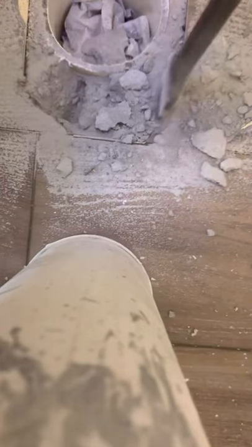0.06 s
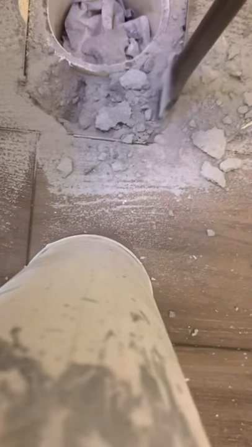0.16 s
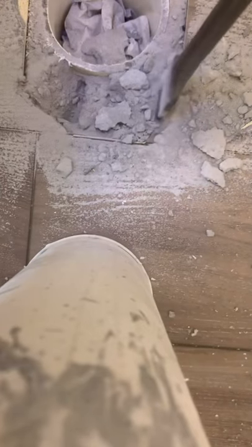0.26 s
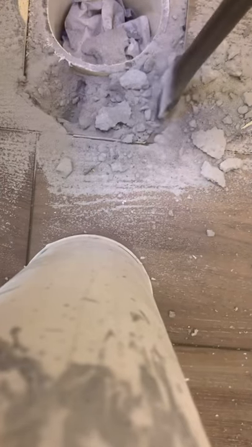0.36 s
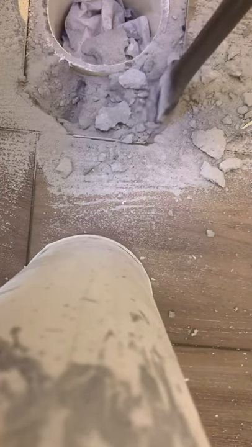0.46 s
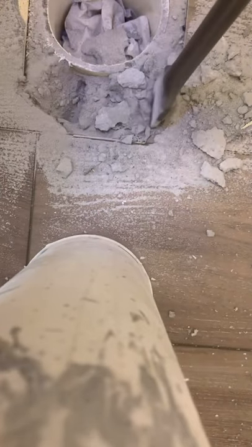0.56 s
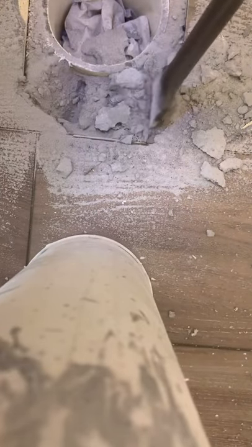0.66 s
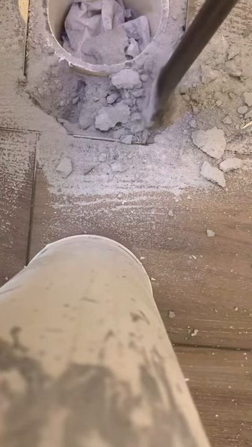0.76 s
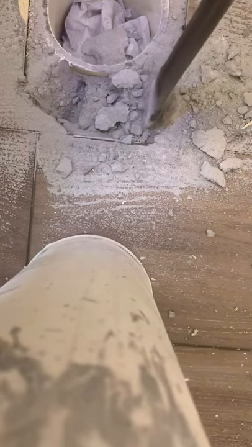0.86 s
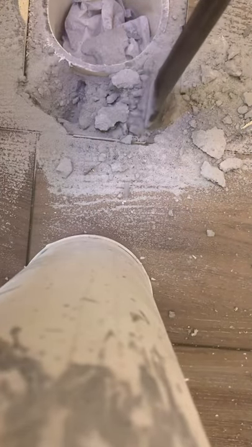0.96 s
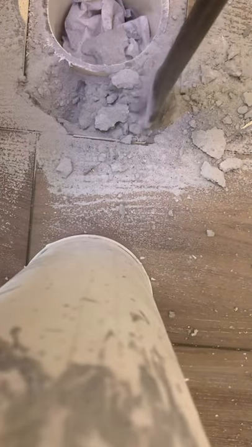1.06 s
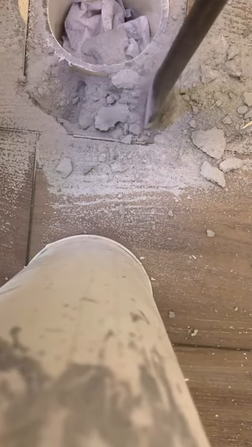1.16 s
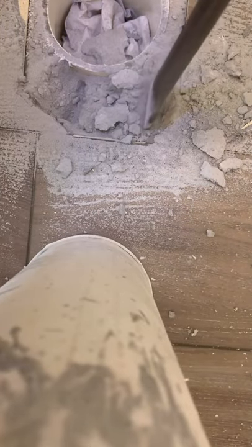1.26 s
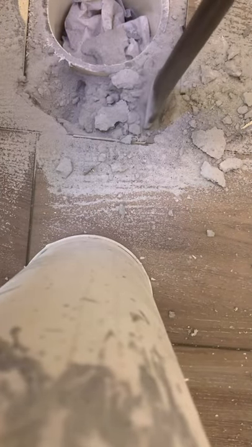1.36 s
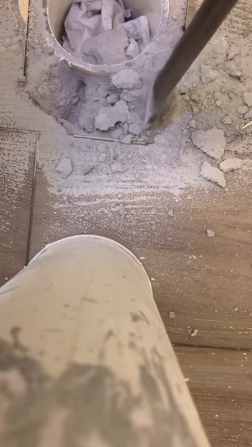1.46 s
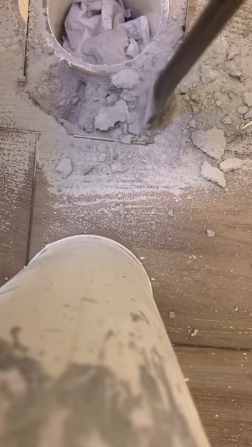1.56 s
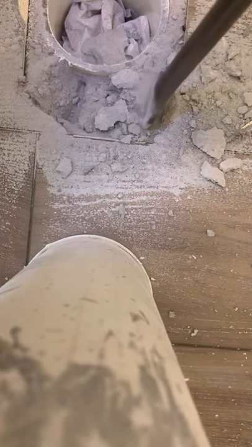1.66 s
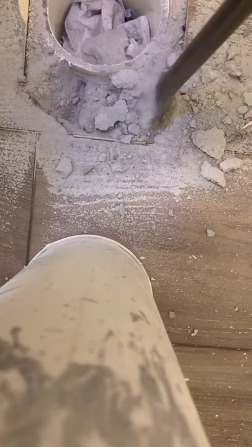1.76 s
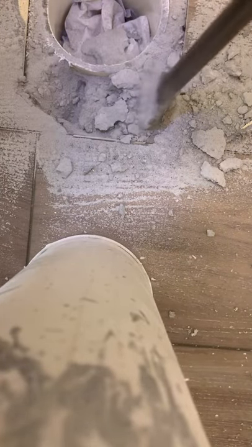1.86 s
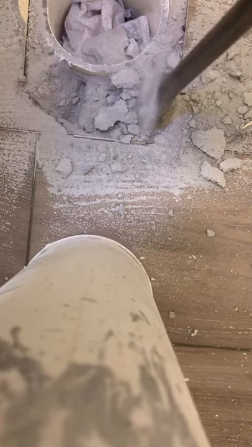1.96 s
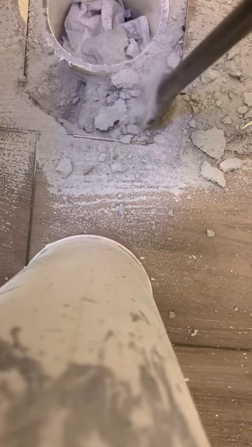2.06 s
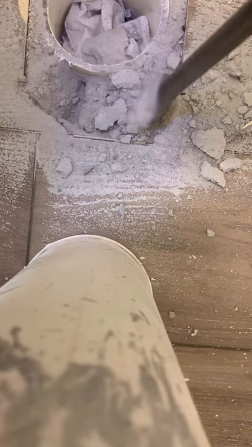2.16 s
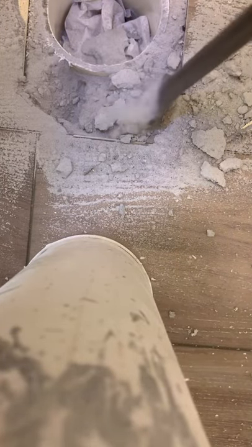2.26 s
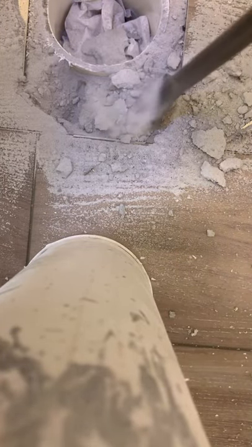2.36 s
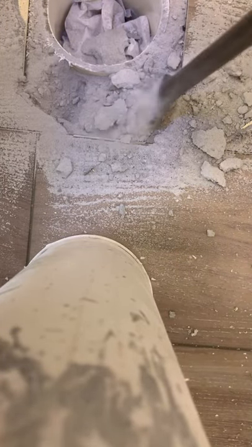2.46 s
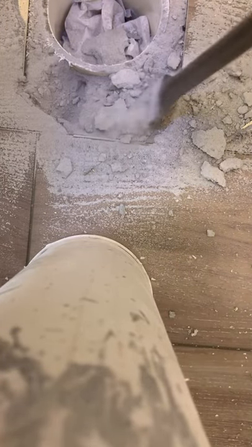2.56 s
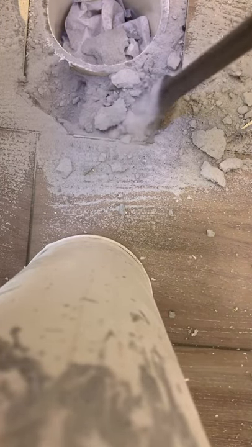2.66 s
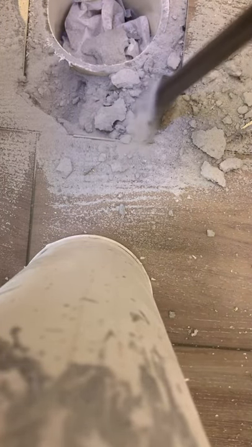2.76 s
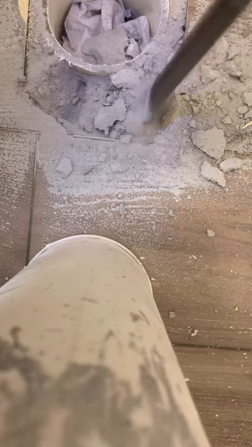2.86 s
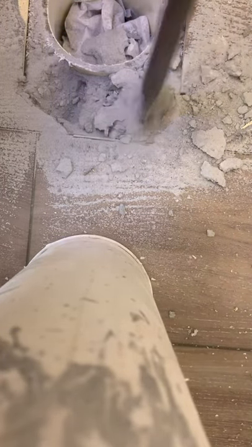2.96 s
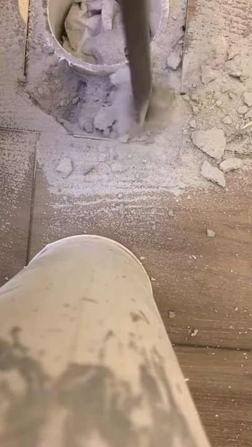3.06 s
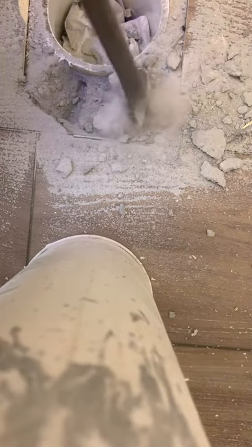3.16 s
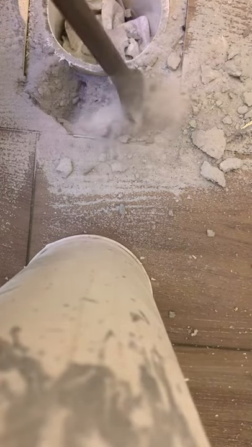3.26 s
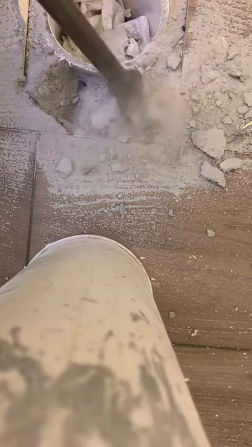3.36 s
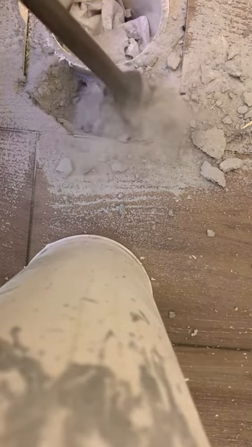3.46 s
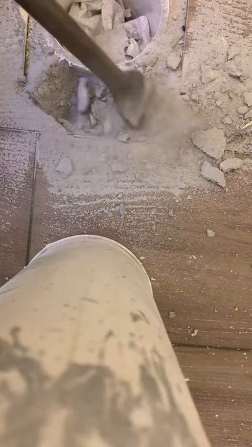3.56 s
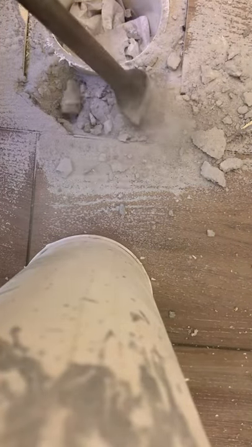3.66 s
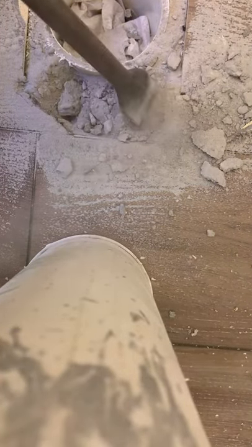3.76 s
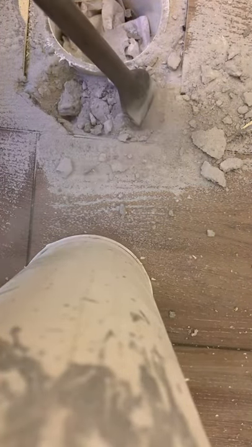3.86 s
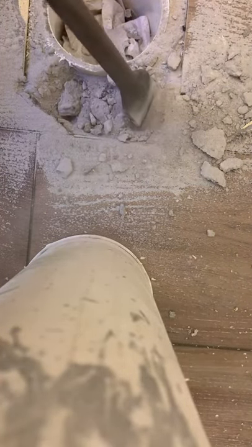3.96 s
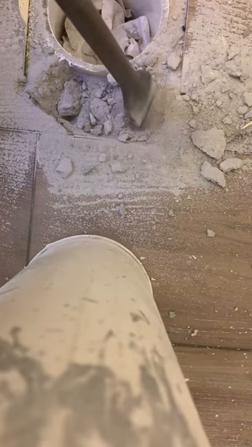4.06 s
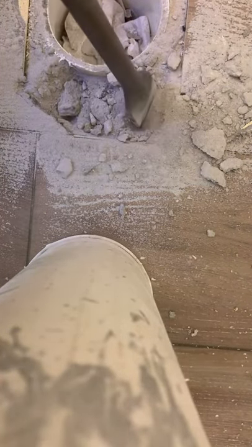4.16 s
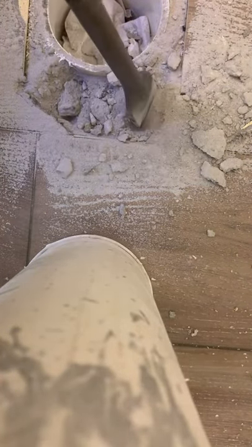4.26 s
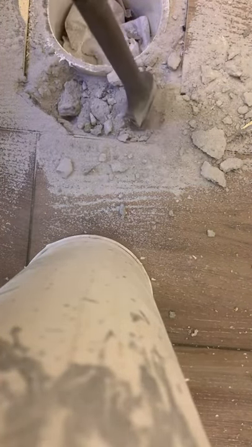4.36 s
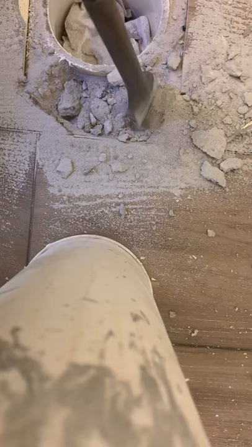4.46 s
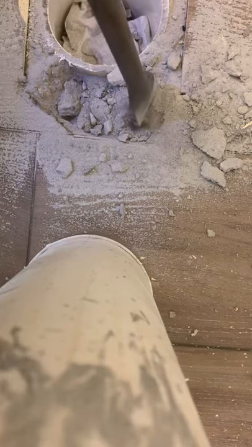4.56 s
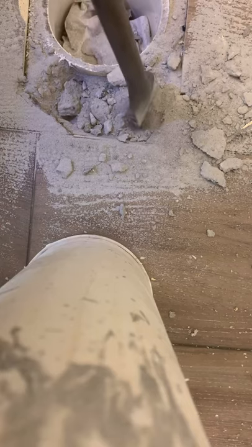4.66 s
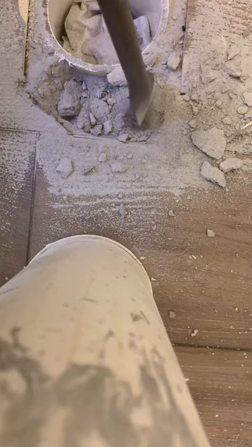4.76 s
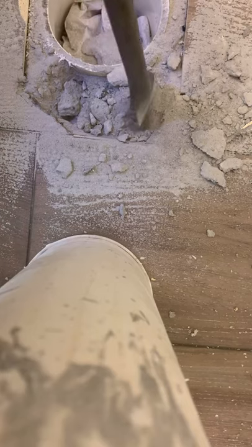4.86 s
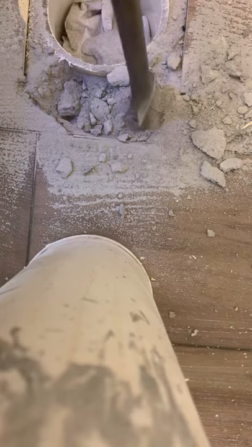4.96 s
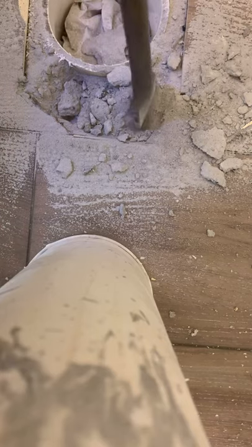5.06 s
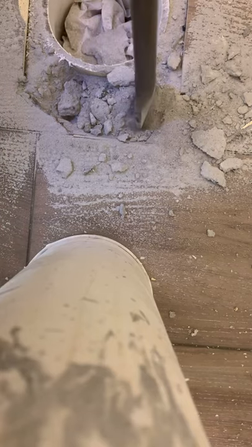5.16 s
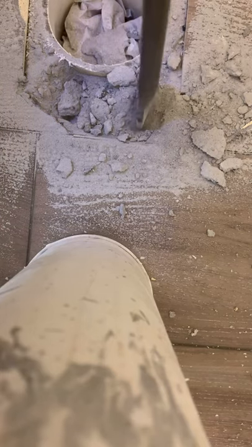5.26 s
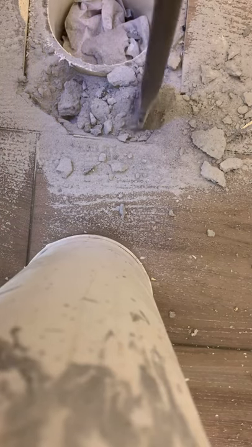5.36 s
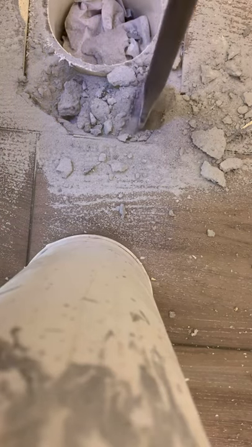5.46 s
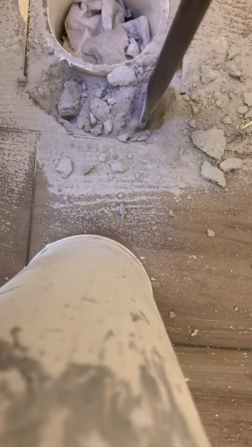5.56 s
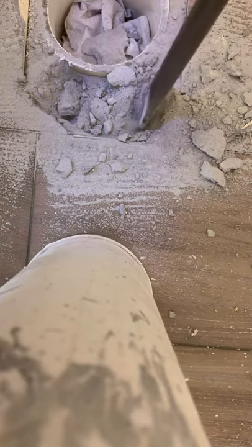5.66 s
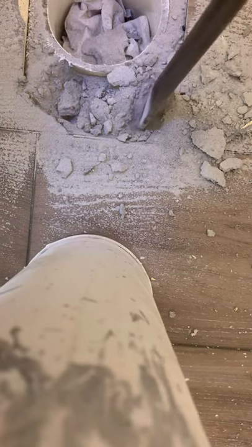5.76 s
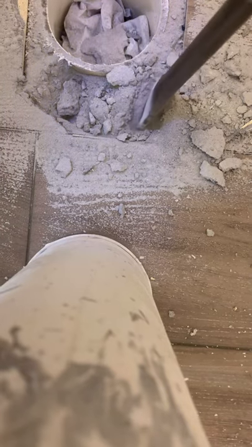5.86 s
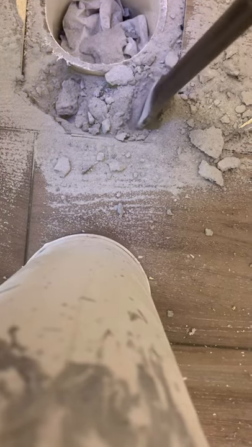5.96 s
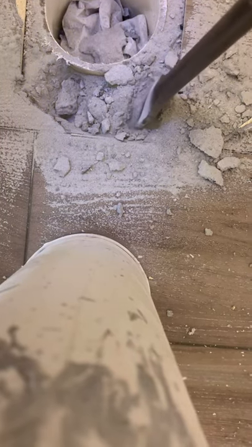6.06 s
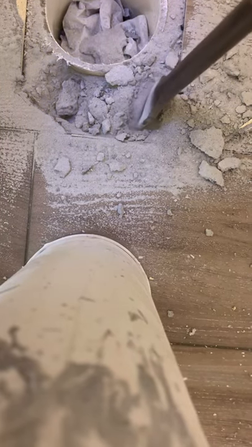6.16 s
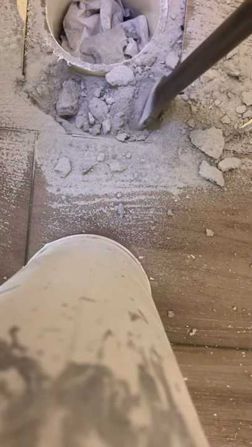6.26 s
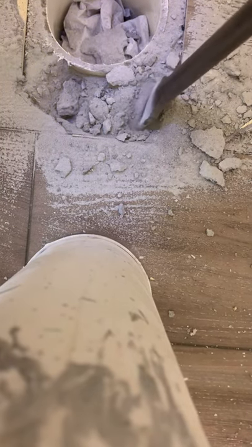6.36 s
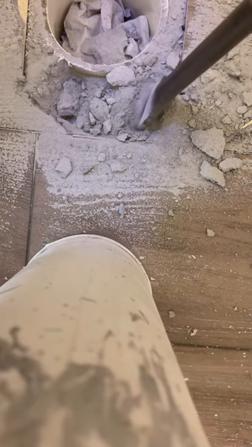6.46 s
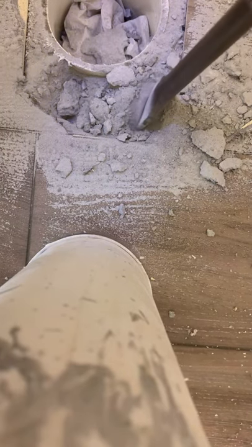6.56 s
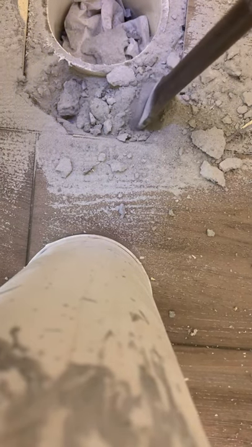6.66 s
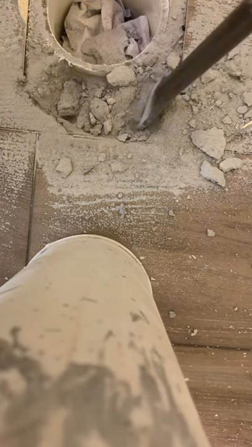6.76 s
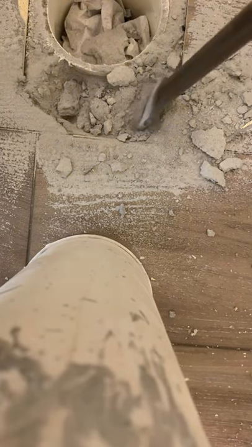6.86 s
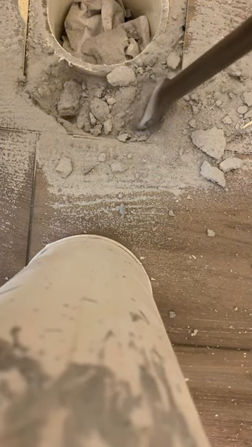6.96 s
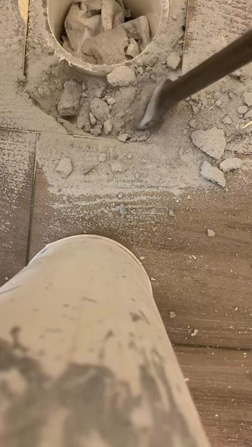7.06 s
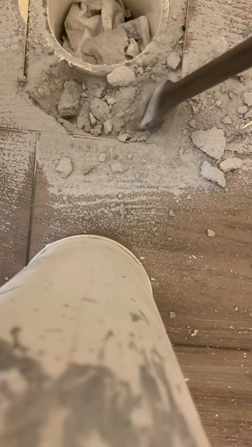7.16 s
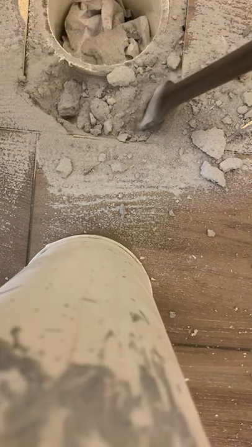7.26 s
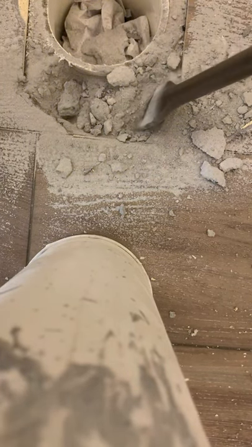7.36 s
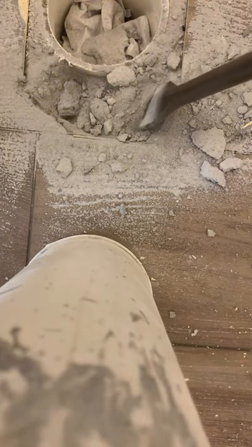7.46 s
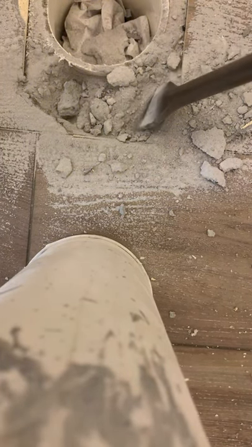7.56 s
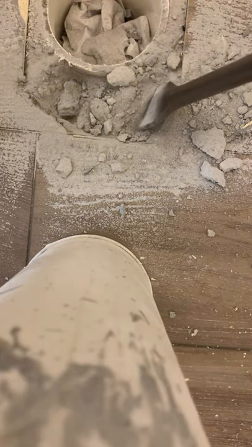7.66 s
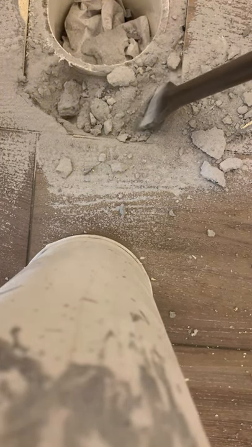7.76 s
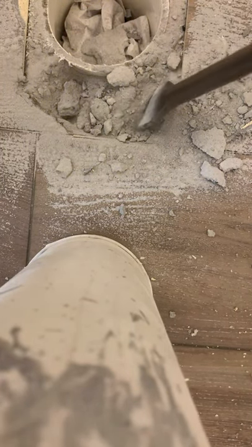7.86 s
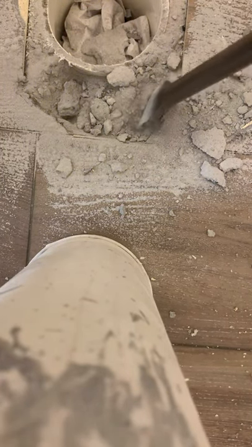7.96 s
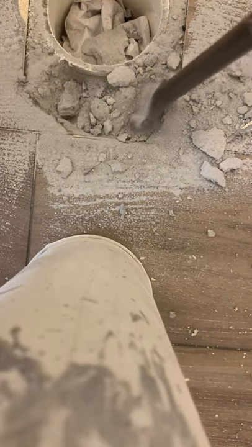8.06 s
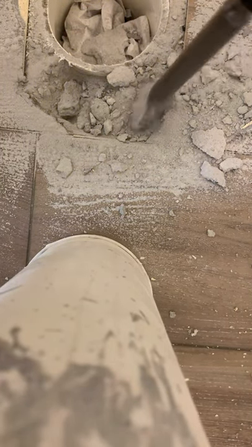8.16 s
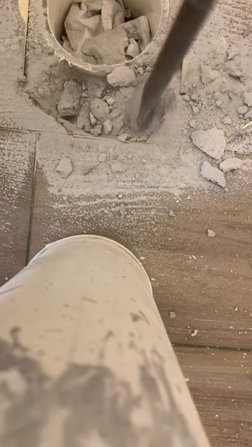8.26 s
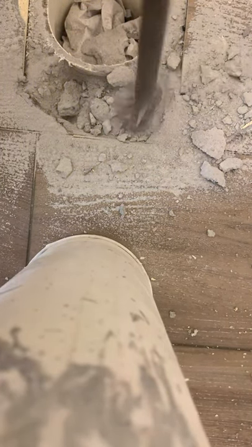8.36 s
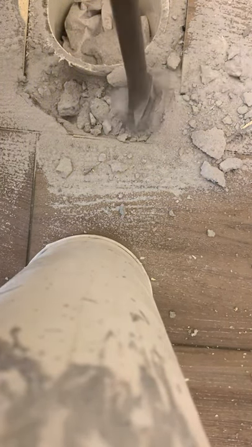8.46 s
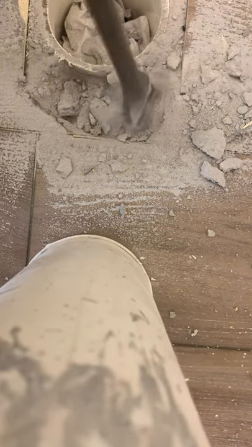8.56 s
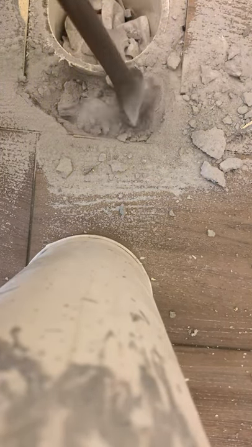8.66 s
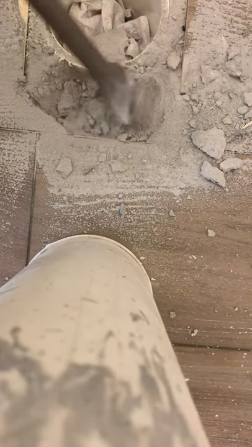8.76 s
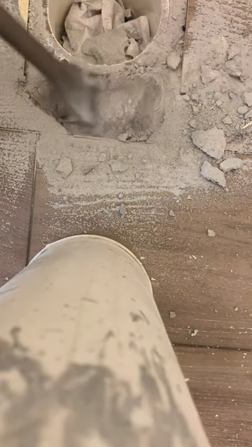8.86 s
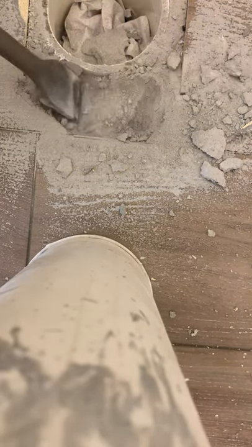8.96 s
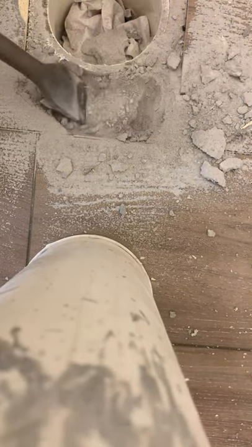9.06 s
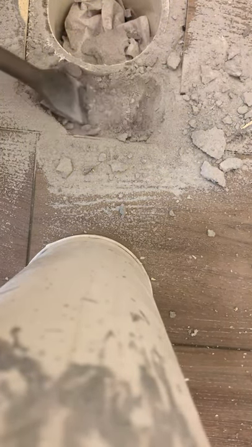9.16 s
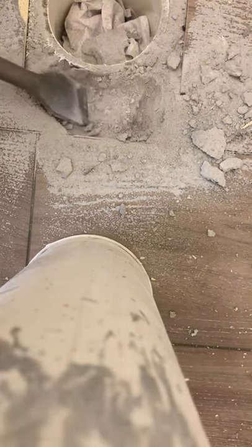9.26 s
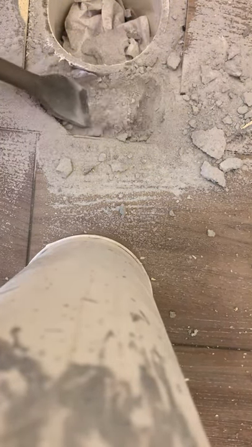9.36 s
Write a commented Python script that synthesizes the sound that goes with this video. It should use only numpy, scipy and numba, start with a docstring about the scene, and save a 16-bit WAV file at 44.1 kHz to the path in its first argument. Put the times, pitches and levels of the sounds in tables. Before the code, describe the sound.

Close, loud electric chipping hammer pounding concrete indoors, gritty crushing and high metallic ringing, a brief pause near the end, then stuttering restart.

```python
"""A bare room with a concrete floor: a rotary hammer drives a chisel into the slab, about 84 blows a second.
Two microphone ports take mostly direct sound; only the steel and the gears have a room echo, faint behind them.
Blow-rate lines make the thump, pulsing noise bands the crushing, damped modes the ringing bit and tool body.
Noise bursts and filtered clicks add cracks, clacks and chips; the bit rings long and shrill when it rides loose.
Near the end the trigger is let go, the motor coasts, and the hammer starts up again with single knocks."""
import sys
import numpy as np
from scipy import signal
from scipy.fft import rfft, irfft, next_fast_len
from scipy.io import wavfile
from scipy.ndimage import uniform_filter1d
from numba import njit

SR = 44100
rng = np.random.default_rng(int(sys.argv[2]) if len(sys.argv) > 2 else 0)


def put_to_file(sound):
    """Save the sound as 16-bit audio at rate SR, in the file named by the first command-line argument."""
    columns = np.atleast_2d(sound).T  # one column per channel
    safe = np.clip(columns, -1, 1)
    whole_steps = np.round(safe * 32767)
    wavfile.write(sys.argv[1], SR, whole_steps.astype(np.int16))


def volts(x):
    """Linear amplitude factor 10**(x/20) for a level x in dB, scalar or array-like."""
    e = np.asarray(x, float) / 20
    return 10 ** e


N = 415422

# Striker speed, sagging when the bit slips. Each row: time in seconds, blows per second.
STRIKER_SPEED = [(0, 83.5), (.55, 83.65), (.8, 83.8), (1.1, 84.07), (1.6, 84.68), (2.1, 85.19),
                 (2.6, 85.07), (2.9, 84.04), (3.2, 82.13), (3.6, 83.64), (4.3, 83.59), (4.8, 84.28),
                 (6, 84.07), (6.7, 84.68), (7.6, 84.44), (8.1, 84.87), (8.5, 84)]
# Strength of the steady thump, high while the bit is pressed home. Each row: time in seconds, relative level in dB.
THUMP_LEVEL = [(0, -43), (1.0, -42), (1.4, -39), (2.3, -37.5), (2.55, -37.5), (2.8, -41), (3.2, -48.5),
               (3.42, -59), (3.58, -40), (4.0, -38), (4.6, -37.5), (5.4, -33), (6.5, -34.5), (6.8, -31),
               (8.05, -32.5), (8.22, -34), (8.45, -53)]
# Moments at which the chisel moves to the next spot, in seconds.
CHISEL_MOVES = [1.15, 3.3, 4.499, 5.35, 6.5]
# Slab response at six chisel positions. Each row: multiple of the blow rate, relative level in dB.
SLAB_SPOTS = [
    [(0.5, -33), (1, -8.5), (1.5, -32), (2, -24), (2.5, -43), (3, -6), (3.5, -30), (4, -16), (4.5, -13),
     (5, -32), (5.5, -40), (6, -3), (6.5, -4.5), (7, -2), (7.5, -20), (8, 0), (8.5, -19), (9, -20),
     (9.5, -20), (10, -0.5), (10.5, -3), (11, -19), (11.5, -18), (12, 0), (12.5, -6), (13, -5), (13.5, -4),
     (14, -12), (14.5, -9), (15, -18), (15.5, -22), (16, -16), (16.5, -3), (17, -15), (17.5, -3), (18, -4),
     (18.5, -20), (19, -7), (19.5, -14), (20, -7)],
    [(0.5, -28), (1, -9.5), (1.5, -25), (2, -20.5), (2.5, -36), (3, -9.5), (3.5, -30), (4, -16), (4.5, -15),
     (5, -21.5), (5.5, -40), (6, -2), (6.5, -9), (7, -1), (7.5, -27), (8, -2), (8.5, -13), (9, -13),
     (9.5, -11), (10, -1), (10.5, -7.5), (11, -11), (11.5, -11), (12, -7), (12.5, -5.5), (13, -2.5),
     (13.5, 2.5), (14, -7), (14.5, -9), (15, -11), (15.5, -19), (16, -19), (16.5, -4), (17, -3), (17.5, -3),
     (18, -8), (18.5, -25), (19, -1.5), (19.5, -15), (20, -14), (20.5, -22), (21, -4), (21.5, -14),
     (22, -17)],
    [(1, -28), (2, -10), (3, -13), (4, -10.5), (5, -6.5), (6, 0.5), (7, -28), (8, -7.5), (9, -5), (10, -9),
     (11, -32), (12, -3), (13, 1), (14, -9), (15, -29), (16, -12), (17, -0.5), (18, -5), (19, -20),
     (20, -11), (21, -1), (22, -7), (23, -1), (24, -2), (25, -14), (26, -2), (27, -18), (28, -20),
     (29, -13), (30, 1.5), (31, -18), (32, -20), (33, -19), (34, -15), (35, 3.5)],
    [(1, -22), (2, -15.5), (3, -16.5), (4, -13.5), (5, -10), (6, -13), (7, -22), (8, 2.5), (9, -12),
     (10, -14), (11, -41), (12, -16), (13, -1.5), (14, -5.5), (15, -7), (16, -14), (17, -6), (18, -3),
     (19, -13), (20, -8), (21, -8), (22, -23), (23, 1), (24, -10), (25, -23), (26, -6), (27, -5), (28, -24),
     (29, -21), (30, -19), (31, -23), (32, -4), (33, -4), (34, 1), (35, 1.5)],
    [(1, -13.5), (2, -16), (3, -12), (4, -18.5), (5, -12), (6, -8.5), (7, -11), (8, 1.5), (9, -11),
     (10, -2.5), (11, -25), (12, -10.5), (13, -2), (14, 1.5), (15, -3), (16, -5), (17, -11), (18, -4),
     (19, -6.5), (20, -4), (21, -14), (22, -12), (23, -14), (24, -2), (25, -17), (26, -20), (27, -4.5),
     (28, -2), (29, -21), (30, -26)],
    [(1, -16), (2, -19.5), (3, -14.5), (4, -28), (5, -14.5), (6, -9), (7, -16.5), (8, -5), (9, -6),
     (10, -2), (11, -49), (12, -11), (13, 0.5), (14, -1), (15, -8), (16, -7), (17, -13), (18, -6.5),
     (19, -12), (20, -4.5), (21, -8), (22, -4), (23, -6), (24, -14), (25, -8), (26, -29), (27, -38),
     (28, -18), (29, -8), (30, -7)],
]
# Crushing of concrete. Each row: time in seconds, crunch level in relative dB, grit over crunch in dB,
# hiss over crunch in dB.
CRUSH_LEVELS = [(0, -34, -8, 0), (.3, -35.5, -6.5, -3), (.45, -37, -8.5, -3.5), (.9, -34.5, -8.5, -3.5),
                (1.5, -34.5, -7.5, -4.5), (2.45, -35, -4, -6.5), (2.86, -33.5, -6, -1),
                (3.05, -38, -8.5, 1.5), (3.3, -41, -5.5, 2), (3.6, -39.5, -4, 1.5), (4.12, -40.5, 0, 4),
                (4.3, -37, -4.5, 0.5), (5.0, -38.5, -2.5, 1.5), (5.6, -35, -5, -2), (6.4, -35.5, -4.5, -4),
                (6.62, -35.5, -0.5, -3), (7.15, -37.5, -0.5, -1.5), (8.0, -35, 0, -1), (8.26, -34, 0, 1.5),
                (8.34, -36.5, -6.5, 1.5), (8.49, -33.5, -11.5, 0.5), (8.56, -43, -7.5, -6),
                (8.68, -46, -7, -2.5), (8.92, -50, -8, 0), (9.02, -43, -7, 6.5), (9.16, -48.5, -15, 8),
                (9.24, -41, -5, 7), (9.38, -36, -8, 1.5)]
# Where rumble, rattle, crunch, grit and hiss rule, in Hz.
CRUSH_CENTRES = [120, 750, 2400, 6500, 11000]
# Colour of the crushing about those levels. Each row: frequency in Hz, offset in dB.
CRUSH_COLOUR = [(30, -39), (55, 1.5), (150, -1.5), (320, -9.5), (410, -7.5), (520, 1), (780, -3), (1100, 1),
                (1600, 2), (2200, 1), (3600, 3), (5500, 4.5), (7600, -1.5), (9000, -4), (12500, 2.5)]
# Each row: frequency in Hz, share of the crushing that pulses with the blow (0-1), left-right likeness (0-1).
CRUSH_PULSING = [(60, 0.2, 0.98), (300, 0.46, 0.38), (790, 0.25, 0.19), (2560, 0.45, 0.63),
                 (5000, 0.32, 0.96), (9200, 0.42, 1), (12400, 0.92, 1)]
# Low layers about their rule. Each row: time in seconds, rumble offset in dB, rattle offset in dB.
LOW_OFFSETS = [(0, 3, 0.5), (.6, -1.5, 0), (1.3, -4, -1.5), (2, -5, -2), (2.6, -2, -1), (2.9, 0, -1.5),
               (3.1, 1, 5), (3.2, -1, 4), (3.32, -1, 3), (3.44, -1, 0), (3.5, -5, 2), (3.6, -1, -9),
               (4.1, -3, -3), (5.2, -4, -5), (7.5, -4, -3.5), (8.1, -4, -3), (8.3, -2, -1), (8.5, 1, 1.5),
               (8.68, 0, -2), (8.9, -5, 2.5), (8.96, -4, -4), (9.04, 2, 1), (9.12, -2, 6), (9.16, -2, 1),
               (9.2, 3, 4), (9.3, 3, 1.5), (9.42, -6, 0)]
# Lumps break off and the rumble swells. Each row: centre in seconds, spread in seconds, rise of the rumble in dB.
LUMP_THUDS = [(.86, .1, 5), (2.574, 0.074, 5), (3.53, 0.048, 14), (4.3, 0.22, 1), (5.64, 0.097, 6),
              (6.503, 0.22, 2.5), (8.232, 0.11, 10), (8.657, 0.026, 14)]
# Modes of shank and tool body. Each row: mean pitch in Hz, relative level in dB, t60 in seconds,
# time in seconds about which it is loudest.
BODY_MODES = [(1888, -15.5, 0.051, 6.4), (2530, -40, 0.014, 3.7), (2910, -13.5, 0.023, 5.2),
              (3380, -9.5, 0.014, 1.9), (4540, -31, 0.018, 6.8), (5560, -10.5, 0.018, 6.1),
              (6420, -11, 0.017, 5.9), (7150, -13.5, 0.0085, 6.7), (8230, -17, 0.018, 0.25),
              (10330, -10, 0.02, 11)]
# One small chip close behind each running blow, louder from about 5 s.
# Each row: time in seconds, relative level in dB.
SMALL_CHIPS = [(0, -35), (2.9, -32), (3.5, -35), (5.2, -28), (8.0, -30), (8.5, -40)]
# Larger chips of concrete snap off. Each row: time in seconds, relative level in dB.
LARGE_CHIPS = [(0.196, -13), (1.16, -9), (1.327, -17), (1.611, -20), (1.635, -18), (1.659, -16),
               (1.705, -18), (2.74, -13), (2.974, -27), (3.306, -28)]
# Ringing of the bit between its flares. Each row: time in seconds, relative level in dB.
RING_BASE = [(0, -36), (.5, -32), (1.2, -32.5), (1.9, -34), (2.8, -31), (3.25, -38), (3.33, -44),
             (3.5, -34.5), (3.8, -32.5), (4.5, -42), (5.4, -35), (5.8, -36), (6.7, -35), (7.1, -41),
             (7.5, -35), (8.1, -34), (8.45, -34)]
# The bit rides free and flares up. Each row: start in seconds, length in seconds, relative level in dB.
RING_FLARES = [(.001, .043, -30), (0.166, 0.045, -27), (0.218, 0.055, -27), (0.281, 0.078, -20.5),
               (0.384, 0.07, -26.5), (.56, .033, -35), (0.697, 0.062, -23), (.8, .027, -34),
               (0.863, 0.082, -29), (1.133, .043, -29), (1.397, .055, -24.5), (1.575, 0.093, -34),
               (1.865, 0.039, -29), (1.96, .025, -42), (2.116, .04, -31), (2.191, .055, -34),
               (2.319, 0.055, -30), (2.517, 0.046, -21), (2.684, .024, -33), (2.745, 0.02, -28),
               (2.899, 0.038, -22), (2.966, 0.083, -24), (3.076, 0.041, -21), (3.125, 0.044, -17),
               (3.205, 0.065, -26.5), (3.354, 0.039, -18.5), (3.394, 0.094, -21.5), (4.29, 0.076, -36),
               (7.48, 0.13, -37), (7.87, .06, -36), (8.2, 0.13, -25), (8.35, .03, -31), (8.407, 0.043, -28)]
# Grip of the concrete on the bit. Each row: time in seconds, main pitch in Hz,
# t60 in seconds before each mode takes its share, spread of the blows in dB.
BIT_GRIP = [(0, 11600, .06, 1.5), (.3, 11600, .1, 1.5), (.6, 11620, .05, 2), (2, 11640, .045, 2),
            (2.9, 11620, .06, 2), (3.1, 11605, .2, .7), (3.45, 11615, .2, .7), (3.6, 11720, .03, 1.5),
            (4.3, 11720, .02, 1.5), (4.9, 11750, .012, 1.5), (5.25, 11850, .025, 1.5),
            (5.6, 11800, .012, 1.5), (6.3, 11720, .02, 1.5), (7, 11750, .015, 1.5), (7.5, 11700, .035, 2),
            (7.75, 11650, .02, 2), (7.9, 11740, .035, 2), (8.1, 11680, .03, 2), (8.3, 11640, .15, 1),
            (8.5, 11630, .08, 1), (8.95, 11620, .16, 1), (9.06, 11620, .13, 1), (9.085, 11620, .03, 1),
            (9.178, 11620, .03, 1), (9.184, 11620, .09, 1), (9.23, 11620, .14, 1), (9.42, 11620, .1, 1)]
# Modes of the bit. Each row: ratio to the main pitch, relative level in dB, share of the t60.
BIT_MODES = [(1, -1.5, 0.8), (1.007, -12, 0.7), (.99, -15, .4), (.965, -21, .3), (1.04, -17, .25),
             (1.08, -20, .2), (1.123, -18, .3), (1.16, -15, .2), (1.23, -9, .3), (.888, -22, .4)]
# Hard blows that stand out, and the single knocks of the restart. Each row: time in seconds, relative level in dB.
HARD_KNOCKS = [(0.146, -13), (0.183, -9), (0.23, -7), (0.2678, -12), (0.388, -11), (0.53, -14),
               (0.566, -15), (0.708, -8), (0.806, -6), (0.875, -7), (1.1378, -11), (1.2446, -16),
               (1.399, -14), (1.577, -10), (1.601, -10), (1.623, -8), (1.695, -9), (1.812, -8),
               (1.8951, -4.5), (1.954, -10), (1.978, -11), (2.0477, -7), (2.1186, -9), (2.2006, -8),
               (2.2243, -9), (2.529, -14), (2.542, -6), (2.624, -10), (2.6943, -9), (2.837, -12),
               (2.895, -10), (2.979, -8), (3.04, -7), (3.1, -10), (3.137, -9), (3.208, -10.5),
               (3.3444, -24), (3.474, -17), (4.302, -11), (8.177, -17), (8.249, -12), (8.331, -9.5),
               (8.3544, -15), (8.367, -15.5), (8.8852, -36), (8.8977, -38), (8.934, -35), (8.953, -42),
               (8.968, -26), (8.987, -19), (9.004, -19), (9.022, -19), (9.043, -18), (9.062, -15),
               (9.0844, -31), (9.107, -8), (9.131, -22), (9.151, -17), (9.168, -16), (9.1842, -12),
               (9.199, -24), (9.2127, -21), (9.226, -14), (9.2394, -16), (9.253, -21), (9.267, -20),
               (9.2838, -14), (9.294, -14), (9.309, -20), (9.324, -18), (9.335, -20), (9.348, -28),
               (9.3628, -16), (9.375, -21), (9.389, -12), (9.401, -24), (9.4104, -7.5)]
# Gear whine, sinking and then climbing as the motor spins up. Each row: time in seconds, centre pitch in Hz,
# relative level in dB.
GEAR_WHINE = [(8.5, 1910, -70), (8.78, 1900, -66), (8.86, 1880, -62), (8.96, 1810, -60), (9.03, 1920, -56),
              (9.1, 1830, -59), (9.135, 1780, -56), (9.155, 1615, -54), (9.18, 1760, -54),
              (9.215, 1960, -52), (9.28, 1850, -48), (9.42, 1982, -46)]
# The slack chisel clacks on the rubble. Each row: time in seconds, relative level in dB.
RUBBLE_CLACKS = [(8.6, -31), (8.658, -32), (8.934, -32), (8.952, -36), (8.969, -25), (8.987, -26),
                 (9.083, -25), (9.1072, -22), (9.132, -23), (9.15, -27), (9.168, -28), (9.1845, -31),
                 (9.2127, -27), (9.298, -19), (9.353, -22), (9.38, -22)]
# Phase by which the left microphone port leads the right. Each row: frequency in Hz, lead in radians.
PORT_LEAD = [(0, 0), (1100, 0), (2760, 1.3), (4800, np.pi), (15200, 6 * np.pi), (22050, 9 * np.pi)]
# Treble of the finished sound: thinned about 14 kHz, cut off near 15.9 kHz. Each row: frequency in Hz, gain in dB.
TREBLE_LOSS = [(12500, 0.5), (13400, -3.5), (13900, -21), (14500, -17), (15600, -9), (15760, -15),
               (15900, -60)]

HAMMER_OFF_S = 8.5
# rule of the low layers: (dB over the usual crunch, share of the crunch's swing)
RUMBLE_RULE, RATTLE_RULE, USUAL_CRUNCH_DB = (-15.5, 1), (-2.86, 1.4), -34.5
RING_FLICKER_DB, RING_FLICKER_PER_S, FLARE_EDGE_S = 2, 14, 0.012
CHIP_SPREAD_DB, CHIP_SCATTER_S = 4.5, 0.00206
RING_LAG_S = .001   # the tip rings a little after the striker lands


def rms_one(x):
    """Scale to rms 1."""
    return x / np.sqrt(np.mean(x ** 2) + 1e-20)


def in_time(rows):
    """Table columns as curves, one value a sample."""
    s, *columns = np.transpose(rows)
    return [np.interp(np.arange(N) / SR, s, column) for column in columns]


def at_hz(points, hz, axis=1):
    """One column of a table read on a log-frequency axis."""
    points = np.array(points)
    return np.interp(np.log(hz), np.log(points[:, 0]), points[:, axis])


def drift(rate):
    """Slow random wander of rms 1, one value every 40 samples; a higher rate wanders faster."""
    r = np.exp(-80 * np.pi * rate / SR)
    noise = rng.standard_normal(N // 40 + 4001)
    slow = signal.lfilter([1], [1, -2 * r, r * r], noise)[4000:]
    return rms_one(slow - slow.mean())


def spread_out(slow, count=1):
    """A slow curve read at every count-th sample."""
    return np.interp(np.arange(0, N, count) / 40, np.arange(len(slow)), slow)


def fade(clicks, seconds):
    """Each click leaves an exponential tail."""
    return signal.lfilter([1], [1, -np.exp(-1 / (seconds * SR))], clicks + 1e-18)


def filtered(x, order, hz, kind):
    """Butterworth filter with its corners in Hz."""
    return signal.sosfilt(signal.butter(order, hz, kind, fs=SR, output="sos"), x)


@njit
def mode(kicks, poles, rise):
    """One mode whose pitch and damping change in time; the kick builds up over a short contact."""
    out, contact, state = np.zeros(len(kicks)), 0j, 0j
    for i in range(len(kicks)):
        contact = contact * rise * poles[i] + kicks[i] * (1 - rise)
        state = state * poles[i] + contact
        out[i] = state.imag
    return out


def blows(cycle):
    """Sample and chance strength of every running blow; sample and level of every hard knock."""
    at = np.flatnonzero(np.diff(np.floor(cycle)))
    at = at[at < HAMMER_OFF_S * SR]
    knock_s, knock_db = np.transpose(HARD_KNOCKS)
    return at, rng.standard_normal(len(at)), (knock_s * SR).astype(int), knock_db


def thump(cycle):
    """Blow train through the slab: wavering lines on the blow rate; strong-weak turns give half multiples."""
    spots, out = [dict(spot) for spot in SLAB_SPOTS], 0
    s = np.arange(0, N, 40) / SR
    place = sum(np.clip((s - at) / 0.44 + .5, 0, 1) for at in CHISEL_MOVES)
    for k in sorted(set().union(*spots)):
        spot_db = np.interp(place, range(len(spots)), [spot.get(k, -35) for spot in spots])
        level = volts(spot_db + 1.99 * drift(3.2))
        waver = 0.42 * rng.standard_normal() + 0.034 * k * drift(6.2)
        apart = 0.46 * drift(0.49) * min(k / 5, 1)      # wall echoes reach the two ports unalike
        phase = 2 * np.pi * k * (cycle[::6] - .2) + spread_out(waver, count=6)
        port_phase = phase + spread_out(apart, count=6) * [[1], [-1]]
        out = out + spread_out(level, count=6) * np.cos(port_phase)
    running = np.clip((HAMMER_OFF_S - np.arange(N) / SR) / 0.056, 0, 1)
    level = running * volts(in_time(THUMP_LEVEL)[0] + [[-6.6], [-5.4]])   # left, right
    return level * signal.resample_poly(out, 6, 1, axis=1)[:, :N]


def crush_db():
    """Levels of rumble, rattle, crunch, grit and hiss, every 40 samples; the low two follow the crunch."""
    crunch, grit, hiss = np.array(in_time(CRUSH_LEVELS))[:, ::40]
    rumble_lift, rattle_lift = np.array(in_time(LOW_OFFSETS))[:, ::40]
    s, swing = np.arange(0, N, 40) / SR, crunch - USUAL_CRUNCH_DB

    def low_layer(rule, lift):
        """Level of a low layer by its rule."""
        over, share = rule
        return USUAL_CRUNCH_DB + over + share * swing + lift

    rumble = low_layer(RUMBLE_RULE, rumble_lift)
    rumble = rumble + sum(rise * np.exp(-((s - at) / length) ** 2) for at, length, rise in LUMP_THUDS)
    rattle = low_layer(RATTLE_RULE, rattle_lift)
    return np.array([rumble, rattle, crunch, crunch + grit, crunch + hiss])


def crushing(at, chance, knock_at):
    """Noise in third-octave bands that swells with each blow and with the striker's rebound."""
    train = np.zeros(N)
    train[at] = volts(2.1 * chance)
    rebound_at = np.minimum(at + int(.0068 * SR), N - 1)
    train[rebound_at] = volts(-6.0 + 3.1 * rng.standard_normal(len(at)))
    train[knock_at[knock_at > HAMMER_OFF_S * SR]] = 0.5
    pulse = fade(fade(train, 0.0016), 0.0024)
    usual = abs(uniform_filter1d(pulse ** 2, 4000)) ** .5
    pulse = pulse / (usual + .05 * pulse.max())
    levels, together = crush_db(), drift(3.4)
    widths_db = 10 * np.log10([260, 900, 2000, 2000, 1000])   # layer widths in Hz
    density = levels - widths_db[:, None]
    edges = 28 * 2 ** np.arange(0, 9.4, 1 / 3)
    white, out = rng.standard_normal((2, 2, N)), 0
    for k, (low, high) in enumerate(zip(edges, edges[1:])):
        hz = np.sqrt(low * high)
        mid, side = filtered(white[k % 2], 2, [low, high], "band")
        weights = [np.interp(np.log(hz), np.log(CRUSH_CENTRES), one) for one in np.eye(len(CRUSH_CENTRES))]
        level_db = weights @ density + at_hz(CRUSH_COLOUR, hz) + 10 * np.log10(SR / 2)
        share, alike = (np.clip(at_hz(CRUSH_PULSING, hz, axis=c), 0, 1) for c in (1, 2))
        level = spread_out(volts(level_db + .5 * together + 1.19 * drift(18.0)))
        swell = np.sqrt(1 - share + share * pulse ** 2) * level
        stereo = np.sqrt(1 + alike) * mid + np.sqrt(1 - alike) * side * [[1], [-1]]
        out = out + swell * stereo / np.sqrt(2)
    return out


def body(at, knock_at):
    """Short rings of shank and housing; their strength and pitch wander as the tool is tilted."""
    at, out = np.append(at, knock_at[knock_at > HAMMER_OFF_S * SR]), np.zeros(N)
    for hz, level_db, t60, loudest_s in BODY_MODES:
        kicks = np.zeros(N, complex)
        tilt_db = 8 * np.exp(-((at / SR - loudest_s) / 1.0) ** 2) + 3 * drift(1.0)[at // 40]
        kicks[at] = volts(level_db + tilt_db) * np.exp(1.3j * rng.standard_normal(len(at)))
        pitch = hz * (1 + 0.016 * spread_out(drift(0.39)))
        poles = np.exp((2j * np.pi * pitch - np.log(1000) / t60) / SR)
        out += mode(kicks, poles, 0.9)
    return volts(in_time(CRUSH_LEVELS)[0] + 9.5) * out    # follows the crunch


def chips(at):
    """Dry band-passed snaps of very uneven size: a small one close behind each blow, larger ones singly."""
    draws = rng.random((len(at), 3))
    clicks = np.zeros(N)
    late = at + (CHIP_SCATTER_S * SR * draws[:, 0]).astype(int)
    small_db = in_time(SMALL_CHIPS)[0][at] - CHIP_SPREAD_DB * np.log(draws[:, 1] + .01)
    clicks[late] = volts(small_db) * np.sign(draws[:, 2] - .5)
    s, large_db = np.transpose(LARGE_CHIPS)
    clicks[(s * SR).astype(int)] = volts(large_db + 1.0)
    snap = filtered(clicks + 1e-18, 1, [700, 3200], "band")
    first_sample = abs(signal.butter(1, [700, 3200], "band", fs=SR)[0][0])   # filter's answer to a unit click
    return snap / first_sample / 2


def ring_db():
    """Level of the ringing: a flickering base with the flares added in power."""
    s = np.arange(N) / SR
    flicker_db = RING_FLICKER_DB * spread_out(drift(RING_FLICKER_PER_S))
    power = volts(in_time(RING_BASE)[0] + flicker_db) ** 2
    for start, length, level_db in RING_FLARES:
        inside = np.minimum(s - start, start + length - s)
        power = power + volts(level_db) ** 2 * np.clip(inside / FLARE_EDGE_S + .5, 0, 1) ** 2
    return 10 * np.log10(power)


def bit(at, chance, knock_at, knock_db):
    """Damped modes of the steel: each blow stops part of the old ringing and starts it anew; firm grip damps it."""
    hz, t60, spread_db = in_time(BIT_GRIP)
    at = at + int(RING_LAG_S * SR)
    decay = 2 * np.log(1000) / t60[at] / 84      # fall of the energy from one blow to the next
    running = volts(ring_db()[at] + 5.5 + spread_db[at] * chance) * np.sqrt(decay / (1 - np.exp(-decay)))
    # a hard knock replaces the running blows within 5 ms
    running = running * (abs(at[:, None] - knock_at).min(axis=1) > .005 * SR)
    out = np.zeros(N)
    for ratio, level_db, share in BIT_MODES:
        kicks = np.zeros(N, complex)
        uneven = volts(2.6 * rng.standard_normal(len(at)))
        kicks[at] = running * np.exp(2j * np.pi * rng.random(len(at))) * uneven
        kicks[knock_at] = volts(knock_db - 2.5) * np.exp(2j * np.pi * rng.random(len(knock_at)))
        poles = np.exp((2j * np.pi * hz * ratio - np.log(1000) / (t60 * share)) / SR)
        struck = kicks != 0
        poles[struck] *= np.clip(0.17 + 2.0 * t60[struck], 0, .8)      # a loose bit keeps more of it
        contact_s = .0009 if share > .5 else .0002
        out += volts(level_db) * mode(kicks, poles, np.exp(-1 / (contact_s * SR)))
    return filtered(out, 2, [9000, 15000], "band")


def ticks(knock_at, knock_db):
    """The bright crack of steel on steel at the hard blows: high-passed noise with a 0.2 ms decay."""
    clicks = np.zeros(N)
    clicks[knock_at] = volts(knock_db - 30.0)
    return filtered(rng.standard_normal(N), 1, 3500, "high") * fade(clicks, 0.0002)


def gears():
    """A rough whistle: one sine, unsteady in pitch and level."""
    hz, level_db = in_time(GEAR_WHINE)
    on = np.arange(N) > GEAR_WHINE[0][0] * SR
    level = volts(level_db + 6.0 + 3.4 * spread_out(drift(39)))
    pitch = hz + 28 * spread_out(drift(61))
    return on * level * np.sin(2 * np.pi * np.cumsum(pitch) / SR)


def clacks():
    """Short broad clacks of steel on loose stone: band-passed noise with an exponential decay."""
    clicks = np.zeros(N)
    s, level_db = np.transpose(RUBBLE_CLACKS)
    clicks[(s * SR).astype(int)] = volts(level_db)
    return filtered(rng.standard_normal(N), 1, [1200, 17000], "band") * fade(clicks, 0.00077)


def room(x, t60=0.36, dull_hz=16000):
    """Wall echoes: six feedback delays a side on a frequency grid; the decay rate doubles at dull_hz."""
    size = next_fast_len(N + SR)
    hz, spectrum = np.arange(size // 2 + 1) * SR / size, rfft(x, size)

    def loop(lag):
        """Gain and delay of one trip round, lag in seconds."""
        return volts(-60 * lag / t60 * (1 + (hz / dull_hz) ** 2)) * np.exp(-2j * np.pi * hz * lag)

    sides = []
    for lags in rng.uniform(.008, .035, (2, 6)):
        loops = [loop(lag) for lag in lags]
        sides.append(irfft(spectrum * sum(g / (1 - g) for g in loops), size)[:N])
    return np.array(sides)


def scene():
    """Thump, crushing, tool body, chips, steel and gears, with the walls' answer to steel and gears."""
    cycle = np.cumsum(in_time(STRIKER_SPEED)[0]) / SR + .78    # blows counted so far
    at, chance, knock_at, knock_db = blows(cycle)
    steel = bit(at, chance, knock_at, knock_db) + ticks(knock_at, knock_db) + gears() + clacks()
    concrete = thump(cycle) + crushing(at, chance, knock_at) + chips(at)
    return concrete + body(at, knock_at) + steel + volts(-19.0) * room(steel)


def band_limit(x):
    """A steep low-pass at the top of the band."""
    return signal.sosfilt(signal.butter(12, 17140, fs=SR, output="sos"), x)


def record(dry):
    """The two microphone ports hear the sound a little apart in phase; the top treble is thinned and cut off."""
    size = next_fast_len(N + 4096)
    hz = np.arange(size // 2 + 1) * SR / size
    lead = np.interp(hz, *np.transpose(PORT_LEAD))
    response = volts(at_hz(TREBLE_LOSS, hz + 1)) * np.exp(.5j * lead * [[1], [-1]])
    mix = irfft(rfft(dry, size) * response, size)[:, :N]
    return band_limit(mix)


dry = scene()
out = record(dry)
put_to_file(out)
```